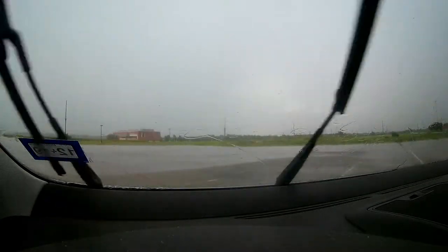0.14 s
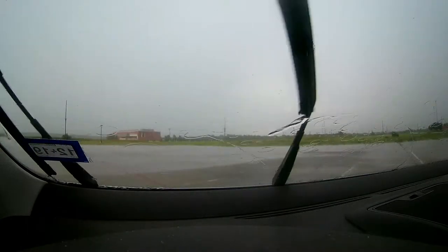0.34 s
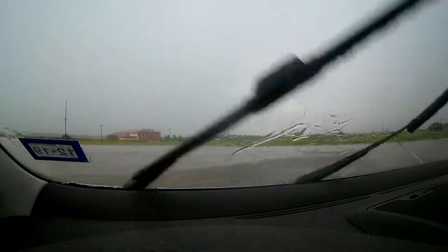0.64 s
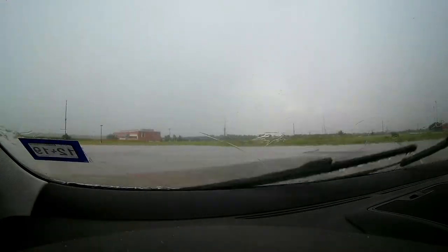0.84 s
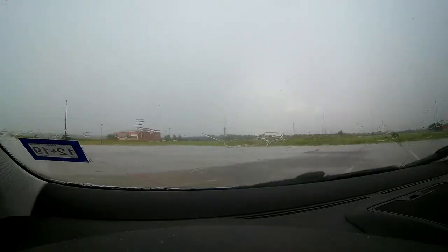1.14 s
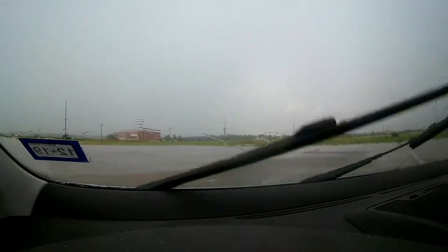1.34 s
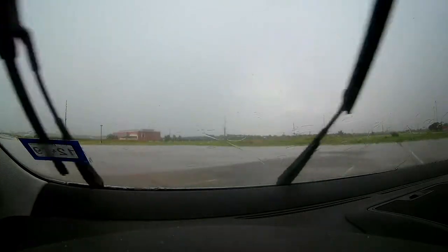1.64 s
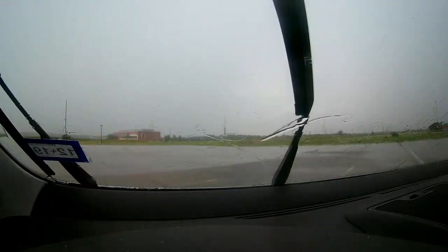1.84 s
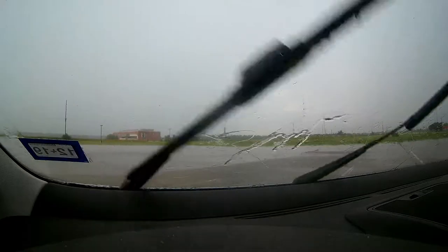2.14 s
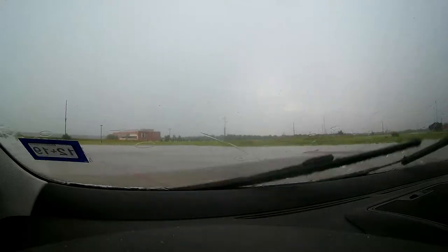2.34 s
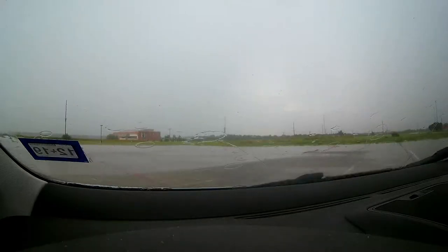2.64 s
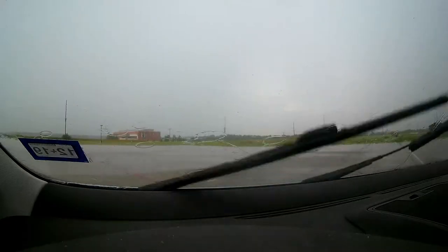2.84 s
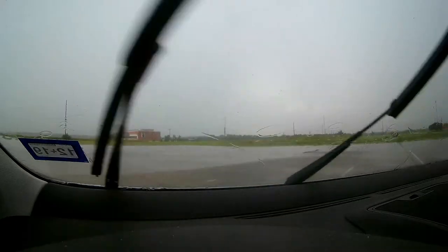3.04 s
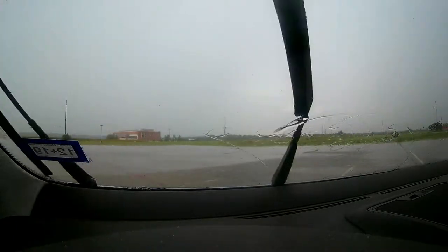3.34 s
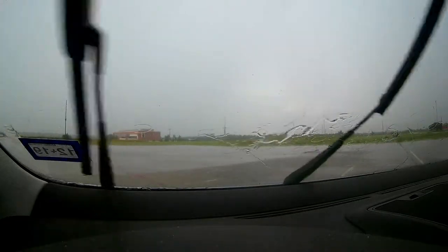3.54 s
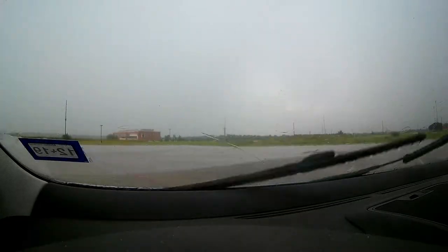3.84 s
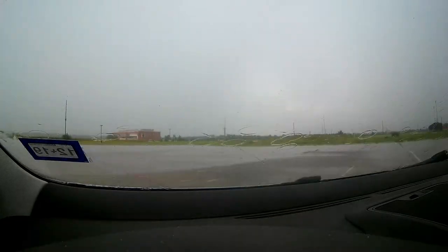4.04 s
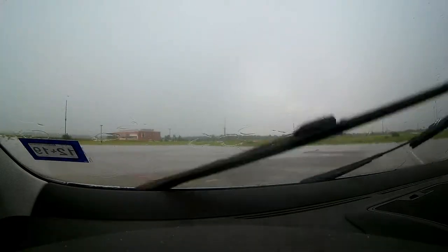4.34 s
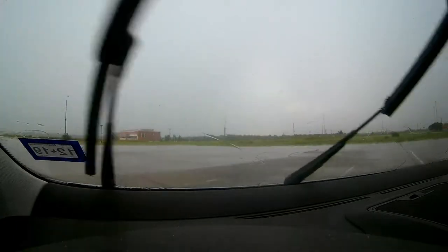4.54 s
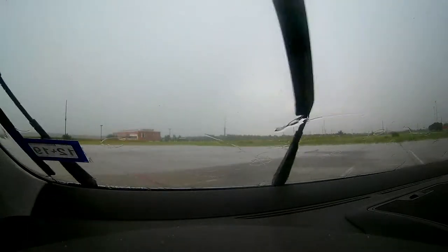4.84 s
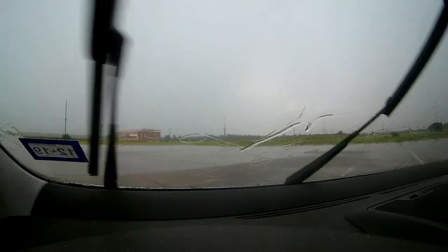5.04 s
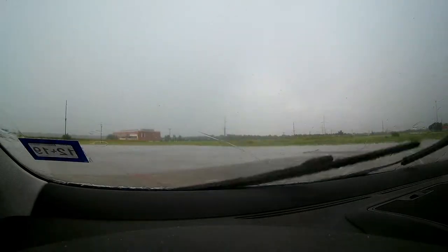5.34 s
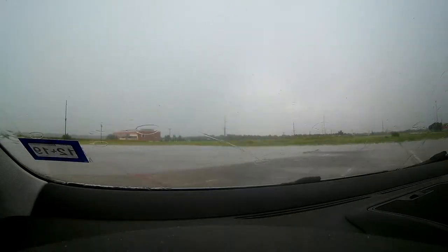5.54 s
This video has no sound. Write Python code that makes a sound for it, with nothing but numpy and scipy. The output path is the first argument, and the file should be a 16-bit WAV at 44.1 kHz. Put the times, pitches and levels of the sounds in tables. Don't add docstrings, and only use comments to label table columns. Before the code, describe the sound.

Steady rain drums on a parked car's roof and ticks on the windshield while wipers thump softly at each turn over a low idle.

```python
import sys
import numpy as np
from scipy import signal
from scipy.fft import rfft, irfft, next_fast_len
from scipy.io import wavfile
from scipy.ndimage import uniform_filter1d

SR = 44100
rng = np.random.default_rng(int(sys.argv[2]) if len(sys.argv) > 2 else 0)


def bounce(signal):
    frames = np.transpose(np.atleast_2d(signal))
    limited = np.clip(frames, -1, 1)
    pcm = np.round(limited * 32767).astype(np.int16)
    wavfile.write(sys.argv[1], SR, pcm)


def elevation(decibels):
    levels = np.asarray(decibels, float)
    return 10 ** (levels / 20)


N = 251811

# frequency in Hz, level in dB per Hz.
GLASS_TONE = [(1400, -20.5), (2300, -2.5), (2900, -8.5), (3220, -13), (3800, -10), (4500, -11.5),
              (4900, -17.5), (5300, -23.5), (6000, -24.5), (6600, -25.5), (7100, -30), (7600, -33),
              (8200, -54), (12000, -86.5)]
# time in s, level on the glass in dB.
SHOWER_LEVEL = [(0.0, -56), (0.22, -53.5), (0.65, -53), (0.86, -52), (1.13, -56.5), (1.91, -57.5),
                (2.22, -54.5), (2.38, -55), (2.81, -51.5), (3.08, -54.5), (3.8, -50.5), (4.02, -54),
                (4.64, -56.5), (5.18, -53), (5.71, -55)]
# time in s, force in dB.
UPRIGHT_REVERSALS = [
    (.420, 1.2),
    (1.932, -0.2),
    (3.447, -0.5),
    (4.954, 0.5),
]


def rms_one(x):
    return x / np.sqrt(np.mean(x ** 2) + 1e-20)


def colour(points, size):
    hz = np.maximum(np.arange(size // 2 + 1) * SR / size, 1)
    at, level_db = np.transpose(points)
    curve_db = np.maximum(np.interp(np.log(hz), np.log(at), level_db), -90)
    cepstrum = irfft(np.log(elevation(curve_db)), size)
    cepstrum[1:size // 2] *= 2
    cepstrum[size // 2 + 1:] = 0
    return np.exp(rfft(cepstrum))


def gusts(rate):
    knots = np.arange(0, N + SR, SR / rate)
    wander = np.interp(np.arange(N), knots, rng.standard_normal(len(knots)))
    return uniform_filter1d(wander, int(SR / rate / 2)) * 0.95


def swells(events, half_s):
    t = np.arange(N) / SR
    return sum(rise_db * np.exp(-((t - s) / half_s) ** 2) for s, rise_db in events)


def shower():
    return np.interp(np.arange(N) / SR, *np.transpose(SHOWER_LEVEL))


def drumming(per_s, spread_db, t60, rise, spectrum, favour_db, count):
    size = next_fast_len(N + SR)
    run_in = SR // 2
    t = np.arange(run_in) / SR
    lands = rng.random(size) < per_s / SR
    sizes = elevation(spread_db * np.minimum(rng.exponential(1, size), 5)) * lands
    sizes = sizes - sizes.mean()
    spot = rng.integers(0, count, size)
    rings = rng.standard_normal((count, run_in)) * elevation(-60 * t / t60) * (1 - np.exp(-t / rise))
    octave = np.log2(np.arange(size // 2 + 1) + 1)
    spots = []
    for k in range(count):
        hump_db = favour_db * np.cos(np.pi * octave + 2 * np.pi * k / count)
        spots.append(rfft(rings[k], size) * elevation(hump_db))
    together = np.sqrt(uniform_filter1d(sum(np.abs(h) ** 2 for h in spots), size=size // 1500))
    total = sum(rfft(sizes * (spot == k)) * spots[k] for k in range(count)) / together
    total[0] = 0
    return rms_one(irfft(total * colour(spectrum, size), size)[run_in:run_in + N])


def hiss():
    # frequency in Hz, level in dB per Hz.
    hiss_tone = [(5000, -32.5), (7400, -0.5), (7900, -4.5), (8400, -1), (11900, -3.5), (15100, -0.5),
                 (16500, -1)]
    size = next_fast_len(N)
    noise = irfft(rfft(rng.standard_normal(size)) * colour(hiss_tone, size), size)[:N]
    return elevation(-78.5 + 0.7 * gusts(6)) * rms_one(noise)


def idle():
    # multiple of the firing rate, peak in dB.
    orders = [
        (1, -52),
        (1.5, -49.5),
        (2, -53.5),
        (3, -56.5),
    ]
    firing_hz = 28.63
    steps = np.linspace(0, N, 40)
    speed, strength = [np.interp(np.arange(N), steps, c) for c in rng.standard_normal((2, 40))]
    phase = 2 * np.pi * np.cumsum(firing_hz * (1 + 0.0042 * speed)) / SR
    return elevation(1.3 * strength) * sum(elevation(level_db) * np.sin(k * phase) for k, level_db in orders)


def strain():
    # time after the upright turn in s, strain in dB.
    labour = [(0.0, 5), (.15, .5), (.35, -1.5), (.55, -6), (.75, 1.5), (.9, 1.7), (1.1, -.5), (1.3, -1)]
    after, level_db = np.transpose(labour)
    sweep_s = 1.498
    return np.interp(np.arange(N) / SR - UPRIGHT_REVERSALS[0][0], after, level_db, period=sweep_s)


def body_rumble(strain_db):
    # frequency in Hz, level in dB per Hz.
    rumble_tone = [(8, -27.5), (15, -13.5), (34, -3), (60, -3.5), (72, 2.2), (85, -2.5), (110, -9.5),
                   (200, -50)]
    return elevation(-46.5 + 1.2 * strain_db) * drumming(3000, 1.8, 0.17, .005, rumble_tone, .3, count=2)


def cabin_boom(swing_db, strain_db):
    # frequency in Hz, level in dB per Hz.
    boom_tone = [(60, -41), (90, -13.5), (102, -5), (120, -3.5), (156, -0.85), (226, -4), (259, -4.5),
                 (297, -14), (420, -18), (900, -69)]
    level_db = -36.5 + 0.13 * swing_db + 0.37 * strain_db
    return elevation(level_db) * drumming(3000, 1.17, 0.12, .005, boom_tone, 2.1, count=6)


def roof_rain(swing_db, swell_db, flurry):
    # frequency in Hz, level in dB per Hz.
    roof_tone = [(160, -29.5), (280, -2.5), (301, -3.5), (341, -2), (383, -4), (653, -3.5), (748, -8),
                 (884, -4), (1180, -11.5), (1470, -11.5), (1600, -16.5), (1760, -17), (3400, -43),
                 (4420, -50.5), (7480, -120)]
    level_db = -36 + 0.31 * swing_db + swell_db + 1.13 * flurry
    return elevation(level_db) * drumming(3500, 2.92, 0.085, 0.0039, roof_tone, 3.8, count=12)


def glass_rain(shower_db, swell_db, flurry):
    level_db = shower_db - 2.56 + 0.6 * swell_db + 0.85 * flurry
    return elevation(level_db) * drumming(1500, 3.37, 0.063, 0.00033, GLASS_TONE, 2.9, count=12)


def rain():
    # time in s, swell on the roof in dB.
    flurries = [(.17, 3.5), (.60, 4.5), (.81, 6.5), (1.38, 4), (1.61, -1), (2.22, 4.5), (2.78, 1.5),
                (3.28, 0), (3.36, 2.5), (.04, 0.5), (1.86, 0), (3.55, -1.5), (3.70, 1.5), (3.83, 2),
                (2.33, 1.5), (4.20, 0.5), (4.35, 2.5), (5.10, 0.5), (5.39, 3.5)]
    shower_db, strain_db = shower(), strain()
    swing_db = shower_db - shower_db.mean()
    splashes = [(s - .005, 2) for s, _ in UPRIGHT_REVERSALS]
    swell_db = swells(flurries, half_s=0.012) + swells(splashes, half_s=0.016)
    flurry = gusts(35)
    panels = roof_rain(swing_db, swell_db, flurry) + glass_rain(shower_db, swell_db, flurry)
    return panels + cabin_boom(swing_db, strain_db) + body_rumble(strain_db)


def spatter():
    return elevation(shower() - 5.5) * drumming(110, 2.74, 0.025, 0.00027, GLASS_TONE, 2.5, count=4)


def glass_drops(drops, octaves):
    out, t = np.zeros(N + SR), np.arange(SR // 10) / SR
    for (s, peak_db, hz), noise in zip(drops, rng.choice([-1, 1], (len(drops), len(t)))):
        tick, splatter = elevation(-60 * t / .01), elevation(-12.5 - 60 * t / .045)
        edges = hz * 2 ** (octaves * np.array([-.5, .5]))
        band = signal.butter(3, edges, "band", fs=SR, output="sos")
        drop = signal.sosfilt(band, noise * (tick + splatter))
        out[round(s * SR):][:len(t)] += elevation(peak_db) * drop / np.abs(drop).max()
    return out[:N]


def windshield_ticks():
    # time in s, peak in dB, centre in Hz.
    fat_drops = [(0.0807, -35, 1720), (0.3656, -43, 1850), (2.116, -40, 1700), (2.4688, -35, 1990),
                 (2.7816, -37, 1700), (2.794, -35, 1830), (2.925, -37, 1750), (2.9682, -35, 1810),
                 (3.3872, -29.5, 1760), (3.489, -35, 1700), (3.547, -36, 1910), (3.6664, -34, 1730),
                 (3.8796, -34.5, 1720), (4.1724, -43, 1960), (4.2005, -37.5, 1810), (4.334, -36.5, 1970),
                 (4.395, -45, 1800), (4.6482, -35, 2000), (5.3702, -39, 1900), (5.6441, -36, 1740)]
    middle_drops = [(0.4798, -45, 3900), (0.596, -42.5, 4540), (0.7677, -47, 3780), (0.9537, -49, 4340),
                    (1.5758, -48, 3910), (1.9001, -41.5, 3900), (1.933, -47, 3640), (2.2218, -42, 3780),
                    (2.3161, -42, 3900), (2.4628, -41, 3850), (2.7706, -42, 4190), (2.8305, -38, 3530),
                    (2.9253, -41, 4020), (3.0016, -45, 4240), (3.1827, -43, 3680), (3.4012, -42, 4640),
                    (3.5463, -42, 3760), (3.6177, -48, 3410), (3.6431, -44, 3890), (3.808, -44, 4210),
                    (3.8801, -51, 4460), (4.1704, -36, 4000), (4.2033, -46, 4220), (4.3141, -45, 3870),
                    (4.336, -42, 3740), (4.8194, -45, 4060), (4.9786, -48, 3960), (5.2924, -48, 3850),
                    (5.4335, -51, 3960), (5.458, -47, 4400)]
    fine_drops = [(0.396, -61, 5400), (0.7662, -56, 5410), (0.8145, -50, 5490), (0.9537, -57, 5200),
                  (1.0994, -55, 6390), (1.3723, -56, 6110), (1.7818, -55, 6440), (1.8996, -63, 5990),
                  (2.1575, -59, 6180), (2.2682, -56, 6120), (2.4658, -57, 6060), (2.6389, -55, 5420),
                  (2.7701, -54, 5350), (2.8569, -52, 5420), (2.9228, -50, 5630), (3.1817, -50, 5240),
                  (3.3997, -56, 5350), (3.5513, -56, 5500), (3.6905, -58, 5810), (3.7688, -55, 5750),
                  (3.8796, -52, 5260), (3.9105, -51, 5490), (4.0442, -55, 5670), (4.1699, -49, 5170),
                  (4.3311, -51, 5460), (4.7441, -49, 5240), (5.456, -59, 5310)]
    return glass_drops(fat_drops, .7) + glass_drops(middle_drops, .8) + glass_drops(fine_drops, .4)


def roof_drops():
    # time in s, peak in dB, ring in Hz.
    heavy_drops = [(0.196, -14, 696), (0.356, -14, 887), (0.557, -13.5, 700), (0.808, -24, 598),
                   (0.97, -12.5, 496), (1.277, -13.5, 647), (1.384, -14, 646), (1.46, -17, 647),
                   (1.596, -18, 910), (1.787, -12, 594), (2.222, -14.5, 745), (2.251, -12, 836),
                   (2.272, -18, 484), (2.426, -11, 870), (2.463, -25, 675), (2.645, -18, 790),
                   (3.239, -21, 950), (3.42, -15, 547), (3.445, -11, 650), (3.908, -11, 610),
                   (4.685, -12.5, 690), (4.748, -12, 517), (4.921, -12.5, 527), (5.195, -12.5, 553),
                   (5.329, -16, 537), (5.376, -14.5, 880)]
    out, t = np.zeros(N + SR), np.arange(SR // 10) / SR
    envelope = (1 - np.exp(-t / 0.0048)) * elevation(-60 * t / 0.027)
    for s, peak_db, hz in heavy_drops:
        out[round(s * SR):][:len(t)] += elevation(peak_db - 4.0) * envelope * np.sin(2 * np.pi * hz * t)
    return out[:N]


def wiper_turns(turns, pushes):
    out, t = np.zeros(N + SR), np.arange(SR // 3) / SR
    for (s, force_db), chance in zip(turns, rng.standard_normal((len(turns), len(pushes), 2))):
        for (strongest, hz, peak_db, swell), (louder, later) in zip(pushes, chance):
            envelope = (t / swell * np.exp(1 - t / swell)) ** 3
            start = round((s + strongest - swell + 0.00047 * later) * SR)
            level = elevation(force_db + peak_db + 0.13 * louder)
            out[start:][:len(t)] += level * envelope * np.sin(2 * np.pi * hz * t)
    return out[:N]


def wipers():
    # time in s, force in dB.
    park_reversals = [
        (1.190, 0.27),
        (2.698, 0.26),
        (4.215, 0.64),
    ]
    # strongest at in s from the turn, mode in Hz, peak in dB, swell time in s.
    upright_pushes = [(-0.16, 91.2, -32.5, 0.049), (-.080, 136.5, -30, 0.0257), (-.035, 172, -32, 0.0242),
                      (-.012, 118.2, -24, 0.02985), (.022, 118, -27, 0.0246), (0.057, 168.5, -31.5, 0.0251),
                      (.014, 200, -25, 0.022), (0.006, 340, -30, .035), (.005, 420, -33.5, .035),
                      (.020, 59, -37.5, 0.048), (.003, 265, -35, 0.038), (0.030, 485, -38, 0.042),
                      (-0.085, 750, -46, 0.033), (-0.0039, 610, -39, 0.0289), (.062, 100.7, -28.5, 0.0268)]
    park_pushes = [(-.016, 118.3, -23.5, 0.0195), (-.008, 170.4, -25, 0.0152), (.010, 172, -25, 0.01927),
                   (.027, 99, -26.5, 0.034), (-.012, 260, -31, .028), (0.0033, 325, -34.5, .045),
                   (0.035, 56.5, -42, 0.06), (.075, 120, -33, 0.034), (-0.0014, 83, -28, 0.0229)]
    return wiper_turns(UPRIGHT_REVERSALS, upright_pushes) + wiper_turns(park_reversals, park_pushes)


def scene():
    return (idle() + rain() + spatter() + windshield_ticks() + roof_drops() + wipers())[None]


def roll_off(x):
    return signal.sosfilt(signal.butter(12, 15790, fs=SR, output="sos"), x)


def record(dry):
    dull = signal.sosfilt(signal.cheby2(8, 40, 8300, fs=SR, output="sos"), dry)
    return roll_off(dull + hiss())


dry = scene()
out = record(dry)
bounce(out)
```